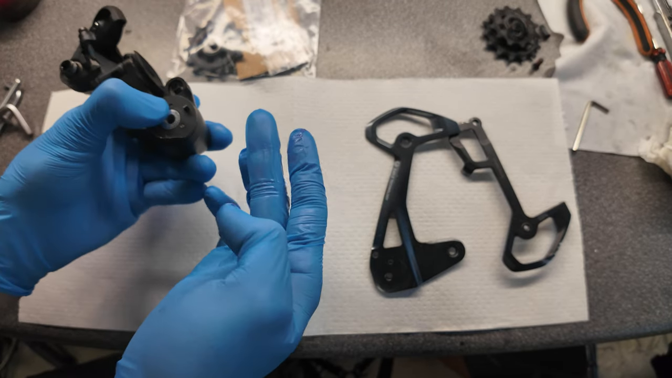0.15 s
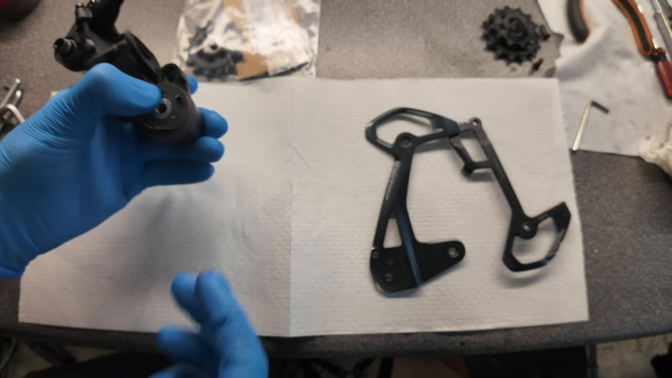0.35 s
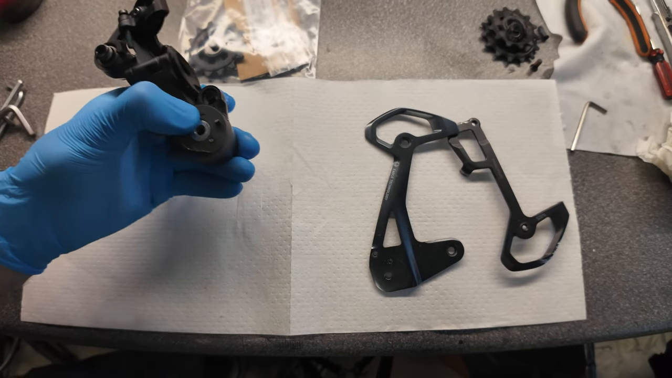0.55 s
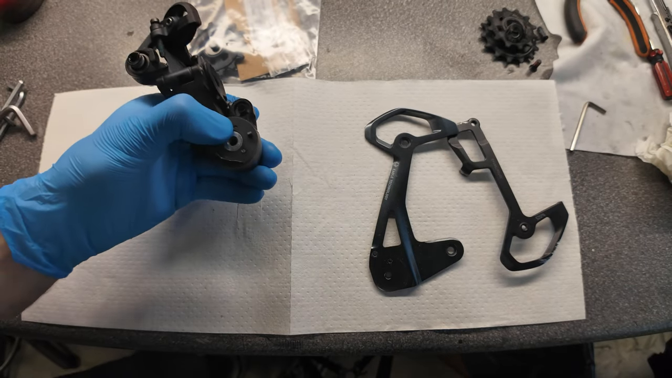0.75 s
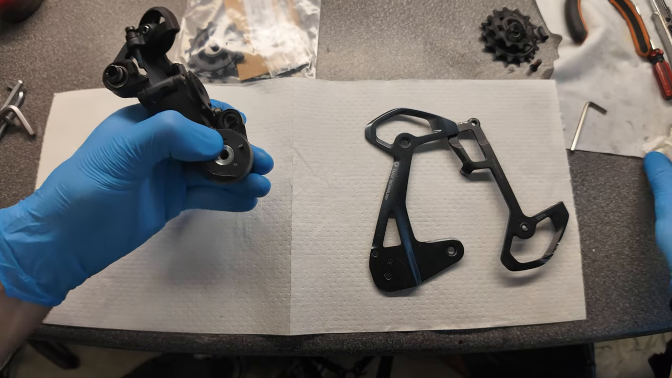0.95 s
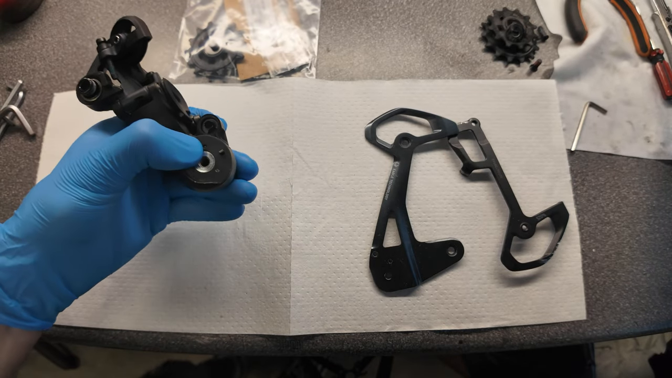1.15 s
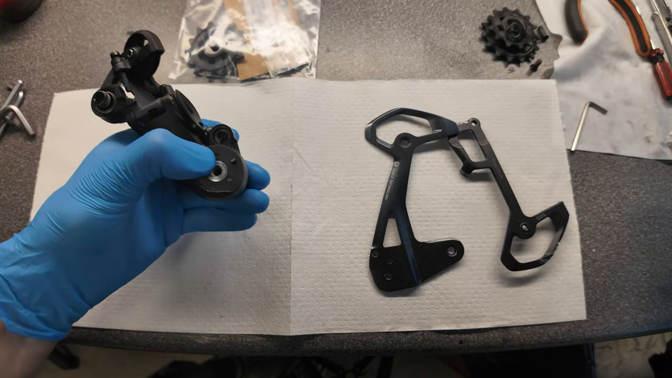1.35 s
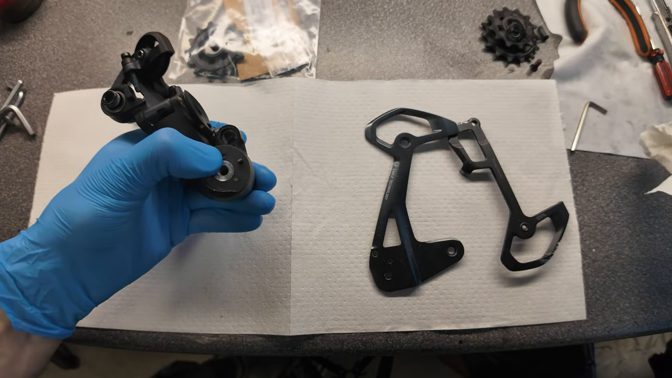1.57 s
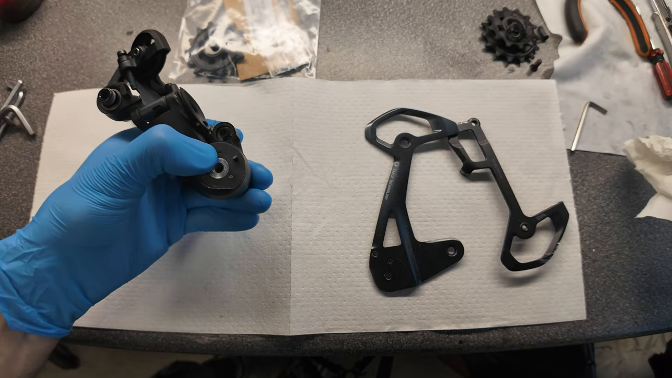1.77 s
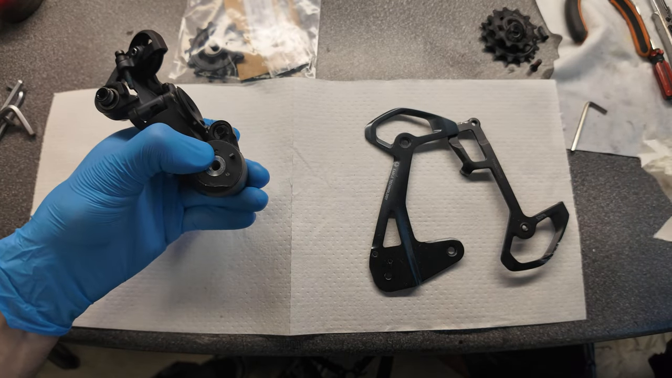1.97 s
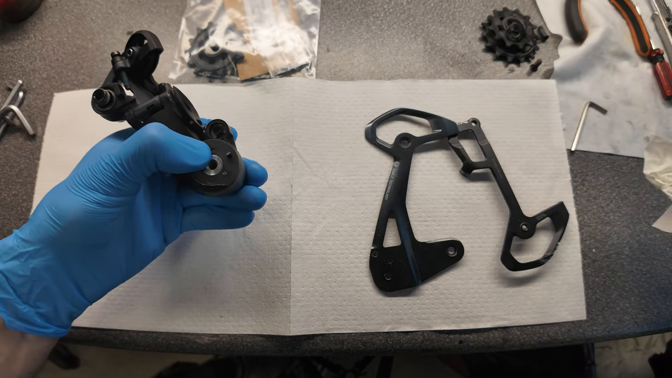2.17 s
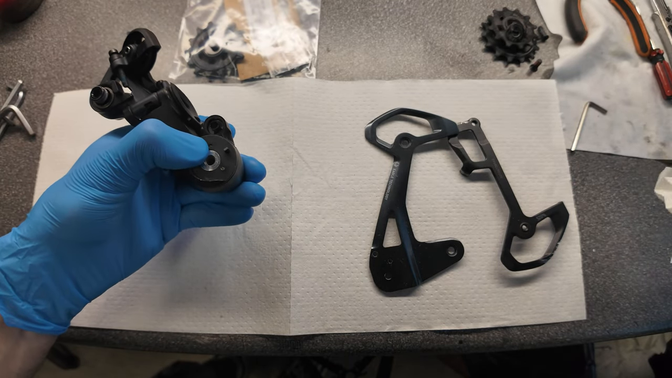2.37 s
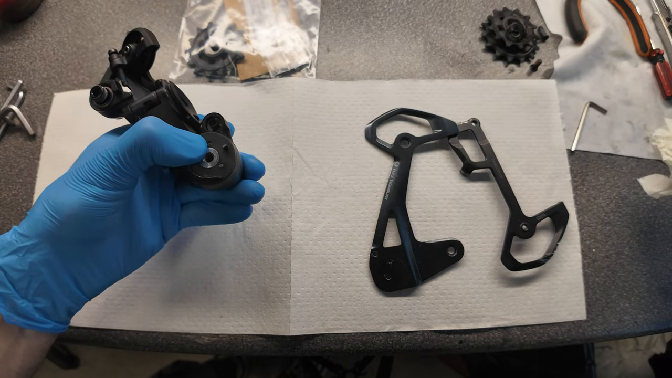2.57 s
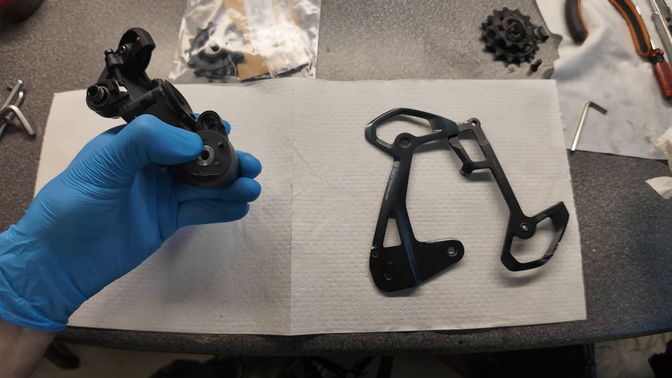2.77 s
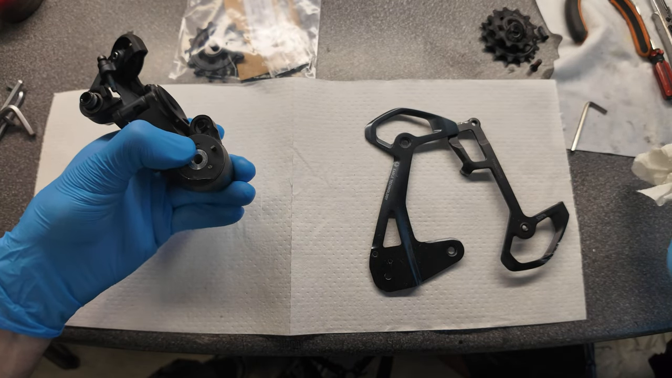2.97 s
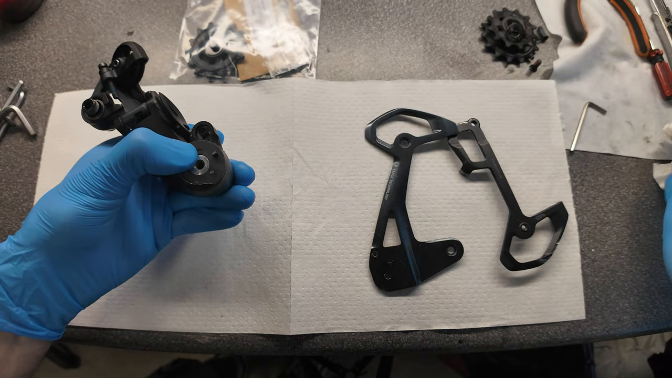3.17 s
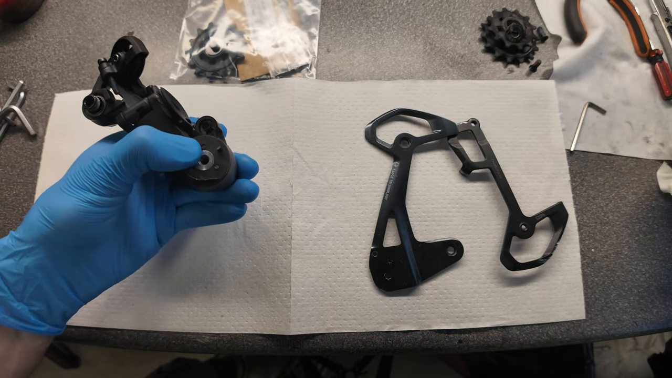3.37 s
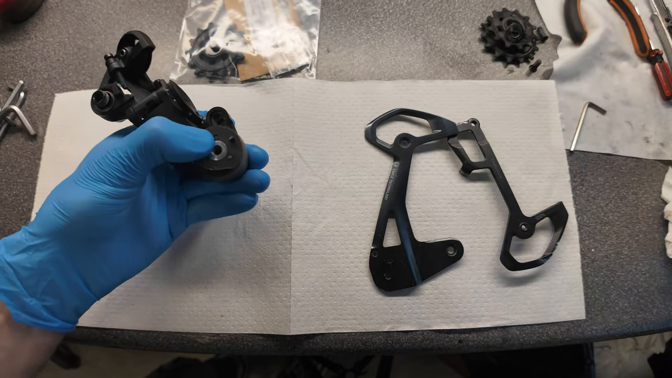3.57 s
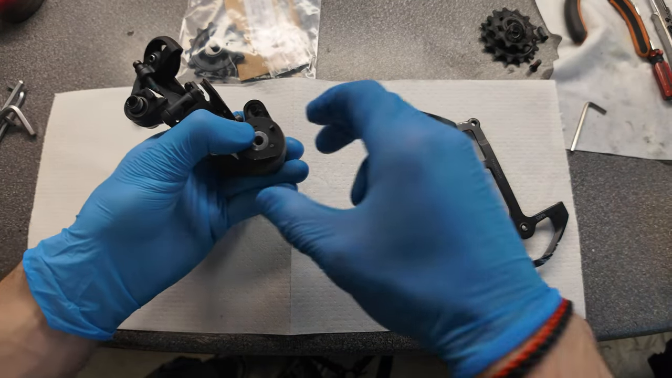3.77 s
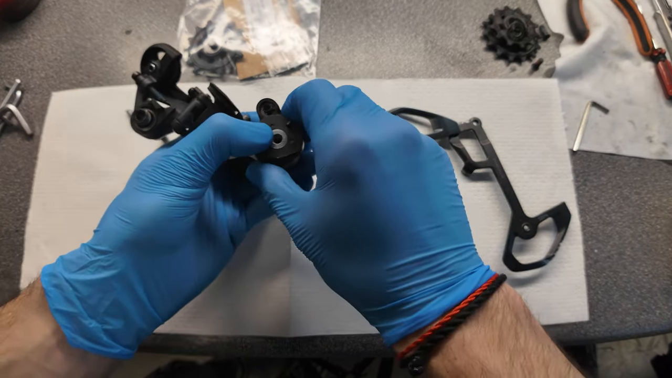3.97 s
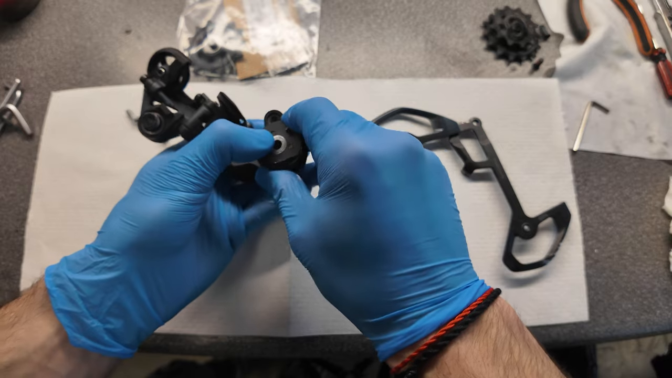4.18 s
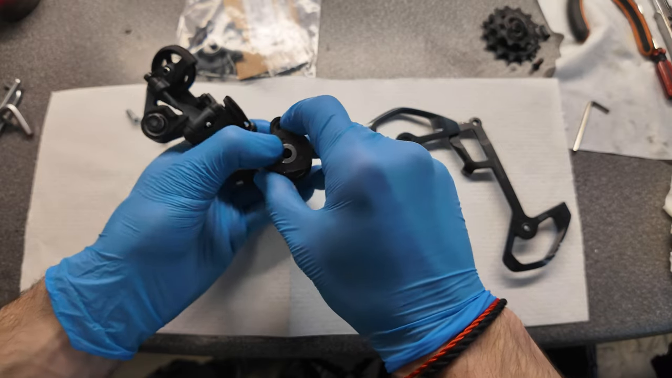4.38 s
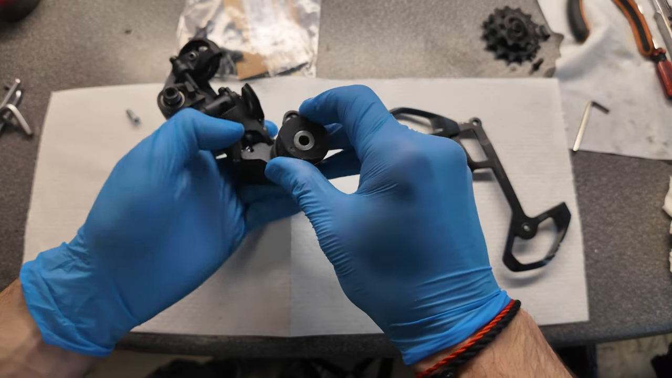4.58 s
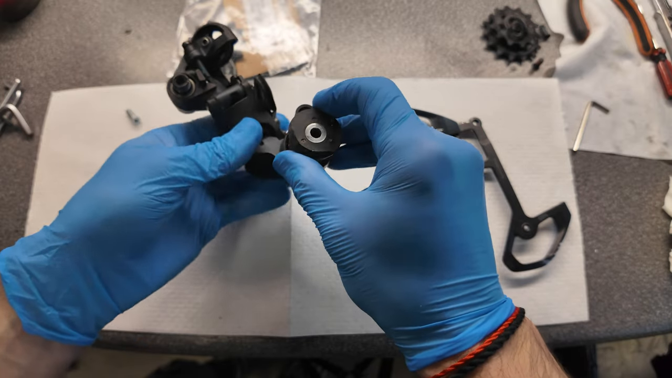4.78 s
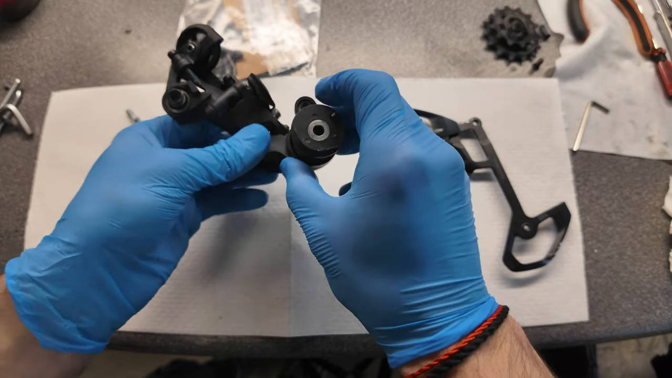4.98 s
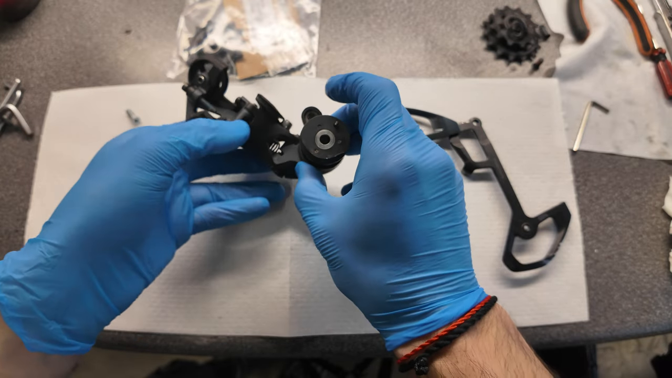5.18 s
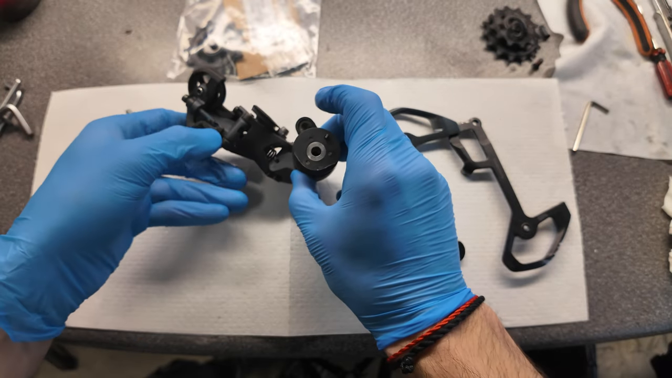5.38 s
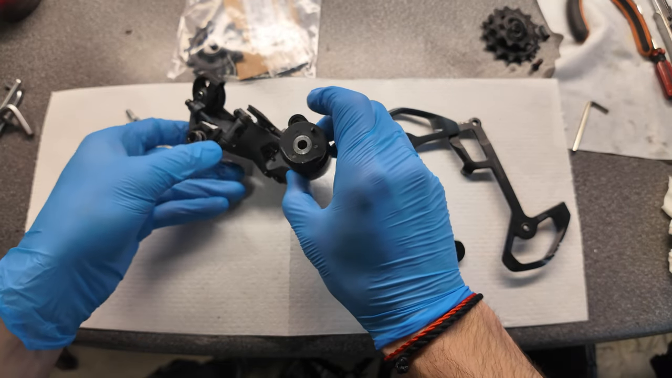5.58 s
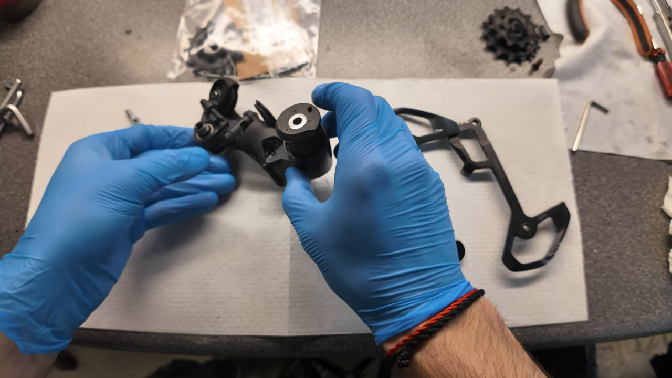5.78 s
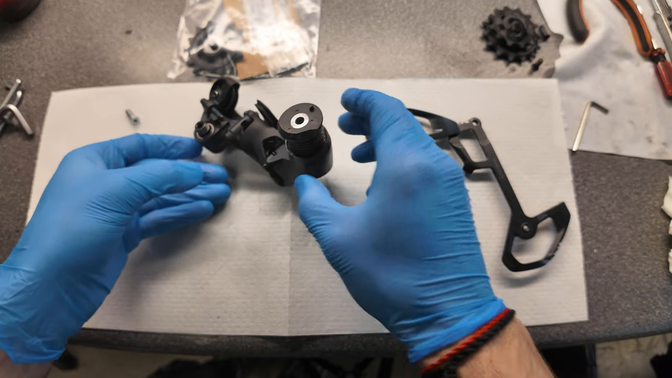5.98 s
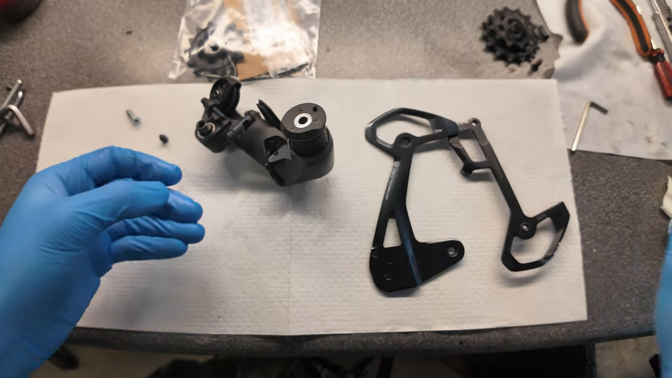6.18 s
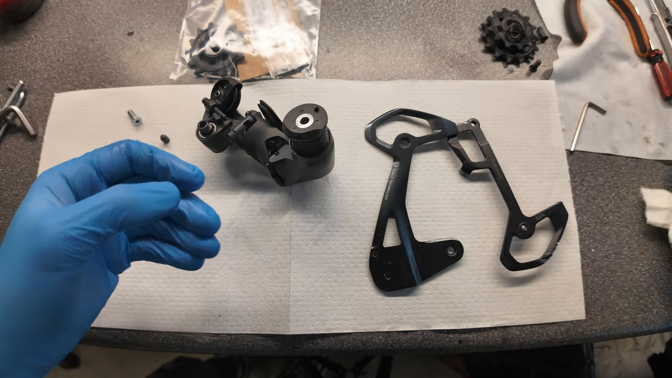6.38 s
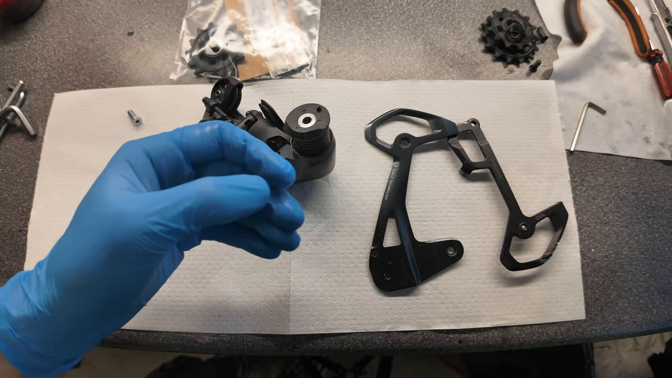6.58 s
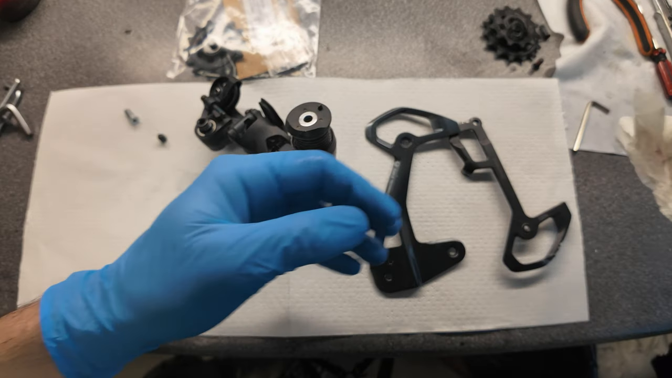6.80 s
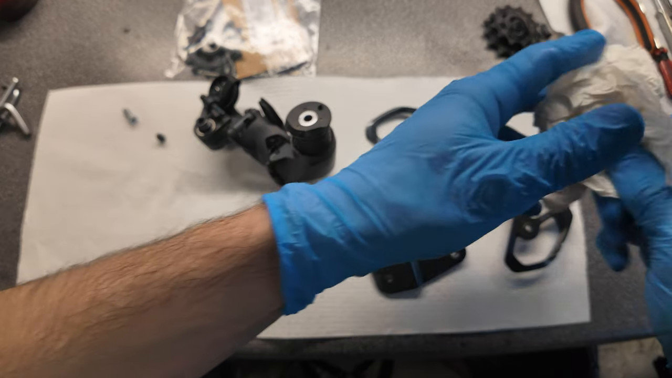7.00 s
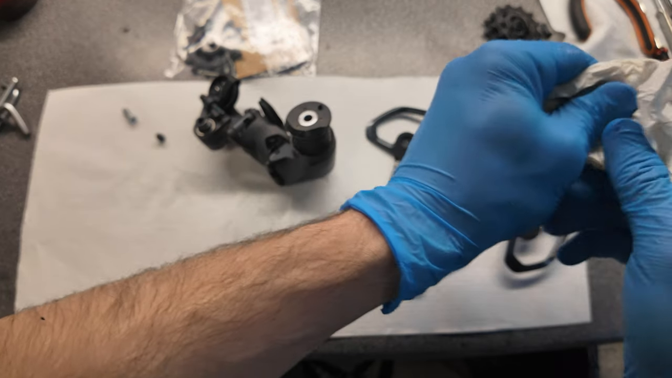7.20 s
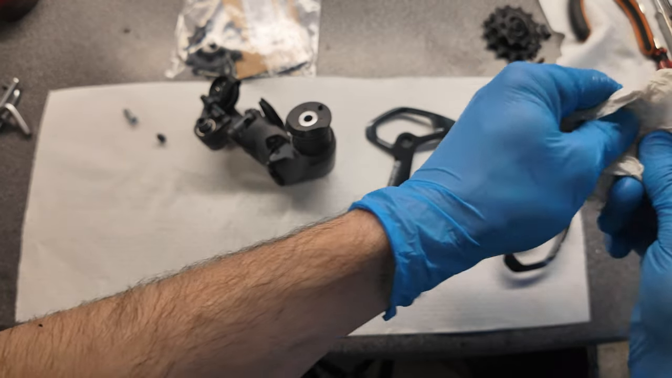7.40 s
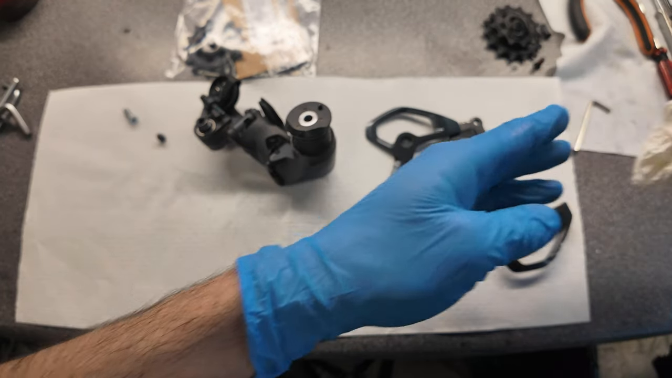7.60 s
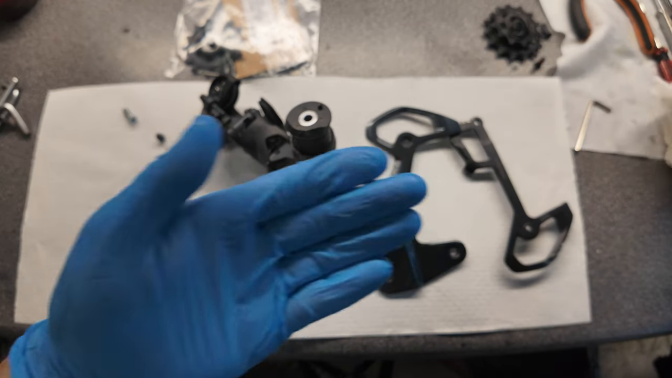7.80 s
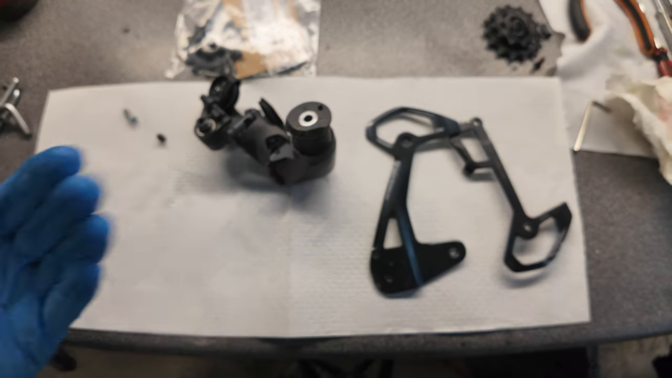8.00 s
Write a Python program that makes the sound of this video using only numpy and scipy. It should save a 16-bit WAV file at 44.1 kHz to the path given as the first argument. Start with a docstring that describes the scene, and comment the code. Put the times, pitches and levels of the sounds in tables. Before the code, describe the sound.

A close stereo microphone hears a workbench in a small room, with faint low motor hum and soft hush throughout. From 0 to 0.5 s rubber gloves rustle quietly with dull little bumps; a faint tap comes at 0.7 s. From about 1.05 to 3.3 s a crumpled paper towel wipes to the right in short, uneven hissing, crackling strokes, with sharp creases near 1.54 and 1.9 s. Ticks follow at 3.4 s. Gloves shift softly; a tiny squeak at 3.87 s leads to a brighter rasping slip that snaps free at 4.1 s. Light, damped steel rings dot 4.8 to 5.8 s. A muted knock at 5.52 s precedes a loud, woody double blow at 5.74-5.76 s, with rapid chatter, metallic clinks and a brief boom. From 6.4 s the towel rubs again, strongest around 7.1-7.7 s with crisp snaps at 7.1 s, then fades by 8 s.

```python
"""Gloved hands work on a metal bicycle part at a workbench, close up in a small humming room.
Rubber rustles from the start; then a paper towel, hissing and crackling with friction, wipes to the right.
A tight piece slips and snaps free in stick-slip squeaks, and small steel pieces touch with short rings.
A woody double knock of damped tones sets the part down, it chatters to rest, and the towel wipes again.
Hum from steady tones and a hush of shaped noise lie under it all."""
import sys
import numpy as np
from scipy import signal
from scipy.fft import rfft, irfft, next_fast_len
from scipy.io import wavfile
from scipy.ndimage import uniform_filter1d, map_coordinates

SR = 44100
rng = np.random.default_rng(int(sys.argv[2]) if len(sys.argv) > 2 else 0)


def waveform_to_disk(signal):
    """Save audio, clipped to [-1, 1], as 16-bit WAV at the path in sys.argv[1]."""
    frames = np.transpose(np.atleast_2d(signal))
    scaled = np.clip(frames, -1, 1) * 32767
    samples = np.round(scaled).astype(np.int16)
    wavfile.write(sys.argv[1], SR, samples)


N = 355005
TOP_HZ = 15900  # upper band limit

# Spectrum of fibre hiss: [f/Hz, level/dB]
PAPER_HISS = [(1400, -36), (2100, -5.5), (2800, 1), (3700, -1), (5200, 0), (7500, -5.5), (10000, -2.5),
              (13000, -4.5), (16000, -11)]
# Spectrum of the towel's fuller rub: [f/Hz, level/dB]
PAPER_BODY = [(100, -5), (300, -12), (450, -8), (610, -6), (740, -5.5), (880, 5), (1200, 1.5), (1550, 3),
              (2000, 3.5), (3000, -1), (4200, 2.5), (9000, -37)]
# The towel lies to the right: [f/Hz, left over right/dB]
PAPER_PAN = [(1500, -1.5), (3500, -2), (6000, -5), (10000, -7), (16000, -8.5)]
# How late the left microphone hears it: [f/Hz, phase/rad]
PAPER_LAG = [(350, 0.12), (600, 1.9), (780, 0.78), (1060, 3.3), (1190, 2.4), (1400, 1.45), (2200, 1.72),
             (3700, 2.69), (5500, 4.4), (10000, 6.3), (16000, 8.4)]


def towel(hiss_db=-1.0, crackle_db=-8, pop_db=-11, body_db=-4.5, hollow_db=-5.5,
          hiss_wet_db=-7, body_wet_db=-14, width_ms=0.024):
    """Paper fibres hiss over rubber, creases crackle, and the crumpled wad resounds as it is pressed."""
    hiss_gain, body_gain = wiping()
    resounding = body_gain * amp(hollow_db) * hollows()
    out = resounding + amp(body_wet_db) * room(resounding)
    # two faces of the wad rub, at slightly different angles to the microphones
    for lag_ms in (-width_ms, width_ms):
        hiss = friction(PAPER_HISS, rate=2500, spread_db=-0.5, smooth_db=5.0, clump_db=1.5)
        hiss = patches(hiss, depth_db=2.0)
        crackle = crinkles(rate=260, centre_hz=3300, octaves=.8, cycles=11, spread_db=3)
        body = friction(PAPER_BODY, rate=600, spread_db=1.0, smooth_db=-3.0, clump_db=2.0)
        body = patches(body, depth_db=1.5)
        pops = crinkles(rate=55, centre_hz=7000, octaves=.7, cycles=7, spread_db=3.5)
        treble = hiss_gain * (amp(hiss_db) * hiss + amp(crackle_db) * crackle + amp(pop_db) * pops)
        bass = body_gain * amp(body_db) * body
        reflected = room(amp(hiss_wet_db) * treble + amp(body_wet_db) * bass, gap=.0022)
        out += place(treble + bass, 0, lag_ms) + reflected
    sides = np.array([[.5], [-.5]])

    def to_the_right(hz):
        return amp(sides * along(PAPER_PAN, hz)) * np.exp(-1j * sides * along(PAPER_LAG, hz))

    return filtered(out, to_the_right)


# Strokes of the towel, at full speed at t: [t/s, rise/s, fall/s, hiss level/dB, body level/dB]
WIPES = [ (1.054, 0.0083, 0.031, -59, -48.5), (1.097, 0.035, 0.039, -48, -44),
         (1.23, 0.071, 0.037, -54.5, -57.5), (1.314, 0.055, 0.04, -47.5, -56),
         (1.405, 0.02, 0.05, -53, -63), (1.554, 0.037, 0.016, -44, -48.5), (1.633, 0.043, 0.033, -51, -59),
         (1.889, 0.015, 0.018, -50, -69), (2.055, 0.044, 0.054, -46.5, -58),
         (2.18, 0.032, 0.031, -53.5, -53.5), (2.293, 0.05, 0.048, -50, -58.5),
         (2.435, 0.03, 0.028, -54.5, -78), (2.555, 0.043, 0.045, -47.5, -62),
         (2.66, 0.037, 0.048, -55, -62.5), (2.92, 0.023, 0.025, -57.5, -72),
         (3.09, 0.048, 0.042, -58, -63.5), (3.22, 0.033, 0.029, -48, -54.5),
         (6.391, 0.0062, 0.04, -55.5, -61), (6.435, 0.031, 0.046, -51.5, -50.5),
         (6.642, 0.015, 0.013, -57, -57), (6.79, 0.094, 0.058, -52.5, -52.5),
         (6.97, 0.11, 0.13, -54.5, -56.5), (7.138, 0.042, 0.076, -41.5, -41.5),
         (7.262, 0.029, 0.055, -52.5, -45), (7.344, 0.083, 0.061, -47.5, -43.5),
         (7.52, 0.074, 0.086, -44, -45), (7.609, 0.085, 0.055, -46.5, -45),
         (7.738, 0.0088, 0.031, -47.5, -56.5), (7.84, 0.12, 0.061, -58, -69),
         (7.889, 0.005, 0.0089, -70, -49.5), (7.95, 0.029, 0.048, -73, -65.5)]
# The held towel drags lightly between strokes: [start t/s, end t/s, level/dB]
HOLDS = [(1.07, 2.423, -61), (2.526, 2.973, -61.5), (3.056, 3.299, -62.5), (6.407, 7.698, -66)]
HOLD_EDGE_S = 0.06  # fade at each end of a hold


def wiping():
    """Gains of the towel's hiss and body: strokes for both, the hiss also carrying the light drag while it is
    held."""
    t = np.arange(N) / SR
    drag = 0
    for start, end, db in HOLDS:
        drag = drag + amp(db) * np.clip(1 + np.minimum(t - start, end - t) / HOLD_EDGE_S, 0, 1)
    hiss = swells([(s, rise, fall, db) for s, rise, fall, db, _ in WIPES])
    body = swells([(s, rise, fall, db) for s, rise, fall, _, db in WIPES])
    return np.hypot(drag, hiss), body


# Hollows in the crumpled towel: [f/Hz, bandwidth/Hz, level/dB]
WAD_HOLLOWS = [(708, 77, -9), (856, 130, -3.5), (1482, 240, -0.5), (1890, 280, 0), (2500, 310, 2),
               (3080, 260, -2)]


def hollows(shift_db=5.0):
    """Fibres excite the hollows of the wad, which open and close in turn as it is kneaded; rms 1."""
    out = np.zeros(N)
    for hz, width, db in WAD_HOLLOWS:
        noise = rng.standard_normal(N)
        hollow = filtered(noise, lambda f: resonance(f, hz, width) ** 2)
        out += amp(db + shift_db * wobble(16)) * unit(hollow)
    return unit(out)


# The fingers shift, at full speed at t: [t/s, rise/s, fall/s, level/dB]
GLOVE_SHIFTS = [(.062, 0.033, 0.012, -63), (.135, 0.059, 0.027, -64.5), (.42, 0.08, 0.043, -68.5),
                (3.44, 0.14, 0.073, -70), (3.69, 0.012, 0.036, -69), (4.2, 0.22, 0.077, -69.5),
                (4.45, 0.19, 0.15, -76.5), (4.64, 0.096, 0.058, -63), (4.81, 0.12, 0.11, -66.5),
                (5.01, 0.1, 0.11, -70.5), (5.32, 0.16, 0.054, -71), (5.485, 0.025, 0.019, -64),
                (5.735, 0.032, 0.017, -66.5), (6.16, 0.029, 0.034, -75.5), (6.31, 0.047, 0.018, -71)]
# Spectrum of sliding rubber: [f/Hz, level/dB]
RUBBER = [(200, 0), (450, -1.5), (1000, -3.5), (2000, -6), (4000, -12.5), (5300, -15), (7500, -5),
          (9700, 6), (11000, 1.5), (12500, 0.5), (16000, -5.5)]


def gloves(crinkle_db=-8):
    """Thin rubber slides and crinkles as the fingers shift their grip."""
    slide = friction(RUBBER, rate=3000, spread_db=0.5, smooth_db=-1, clump_db=4.0)
    slide = patches(slide, depth_db=3.5)
    folds = crinkles(rate=170, centre_hz=7500, octaves=.6, cycles=14, spread_db=3)
    rub = swells(GLOVE_SHIFTS) * (slide + amp(crinkle_db) * folds)
    return amp(0.5) * place(rub, pan_db=9.0, lag_ms=-0.051) + amp(1.5) * room(rub, gap=0.0047)


# Sharp ticks: creases of the towel to the right, light contacts of gloves and part:
# [t/s, level/dB, treble tilt/dB, left over right/dB]
TICKS = [(0.711, -60, -14, -6), (1.041, -41.5, -15, -3), (1.5403, -34, -5, -3), (1.8845, -39, 8, -6),
         (2.48, -39.5, 7, -8), (2.963, -43.5, 15, -15), (3.4124, -45, 17, -19), (3.4521, -47, 6, -28.5),
         (4.18, -45, -5, 0), (4.235, -44, -3.5, 4), (5.185, -50, -12, 0), (5.2973, -45.5, -1, 5),
         (6.3869, -47, -4, -6), (7.0843, -38, 2, -6), (7.1097, -30, 2, -8), (7.7331, -39, 9, -9),
         (7.887, -48, -2, 8), (7.9623, -45.5, -3, -1)]
# Spectrum of a tick before its treble tilt: [f/Hz, level/dB]
TICK_COLOUR = [(500, 2.5), (2000, -9.5), (4000, -2.5), (5500, -4.5), (7500, -5), (10000, 6.5), (16000, 0.5)]


def ticks(t60=0.025, rise=0.00033, wet_db=-6):
    """Each towel crease or light contact is a brief burst of noise, bright or dull by its treble tilt."""
    out, t = np.zeros((2, N)), np.arange(SR // 4) / SR
    for s, db, treble_db, pan_db in TICKS:
        burst = colour(noise_burst(t, rise, t60), TICK_COLOUR)
        burst = filtered(burst, lambda hz: amp(along([(5000, 0.46), (10000, treble_db)], hz)))
        burst = amp(db) * burst / np.abs(burst).max()
        add(out, s, place(burst, pan_db, lag_ms=-0.022) + amp(wet_db) * room(burst))
    return out


# Small steel pieces touch lightly: [t/s, level/dB, f/Hz]
TINKS = [(4.841, -54.5, 6200), (5.041, -60, 4600), (5.349, -49.5, 5200), (5.553, -51.5, 4900),
         (5.7507, -52, 4600), (5.8305, -60, 6500), (6.323, -58, 5160)]


def tinks(t60=0.024, rise=0.00038, width_hz=900, pan_db=3, wet_db=-8):
    """Each light touch of steel rings for a moment, damped by the hand."""
    dry, t = np.zeros(N), np.arange(SR // 10) / SR
    for s, db, pitch_hz in TINKS:
        scrape = noise_burst(t, rise, t60)
        tink = filtered(scrape, lambda f: resonance(f, pitch_hz, width_hz))
        add(dry, s, amp(db) * tink / np.abs(tink).max())
    return place(dry, pan_db, lag_ms=-0.02) + amp(wet_db) * room(dry)


# The tight piece slips in short squeaks:
# [t/s, level/dB, length/s, stick-slip rate f/Hz, tilt/dB per octave from 2 to 12 kHz]
SLIPS = [(3.868, -60, 0.006, 2090, -14), (3.8754, -42.5, 0.0071, 1903, -13.5),
         (3.8845, -44.5, 0.004, 2076, -4), (3.9065, -55.5, 0.0034, 1960, -16),
         (4.1032, -38.5, 0.0039, 1746, -5.5), (4.1072, -35.5, 0.00262, 2270, -3.5),
         (4.1108, -31.5, 0.0017, 3600, 2)]
# Resonances of the part, damped by the grip: [f/Hz, bandwidth/Hz, level/dB]
PART = [(826, 280, -1), (1490, 360, 3.5), (2080, 440, 10.5), (2420, 300, -3), (3080, 350, 2),
        (3680, 320, -5), (5130, 1100, 0), (7600, 1300, -2.5), (9700, 1600, 0.5)]
# What slips out between the fingers: [f/Hz, level/dB]
ESCAPE = [(700, -9), (1400, -5), (2100, 0.5), (2800, -1), (4300, -7), (10000, -6.5), (16000, -14)]


def slips(echo_s=.01, echo_t60=0.04, echo_db=-5, wet_db=-6):
    """The tight piece sticks and slips; each squeak swells, rasps through the part and breaks off."""
    dry, bare, t = np.zeros(N), np.zeros(N), np.arange(SR // 10) / SR

    def part(f):
        modes = sum(amp(db) * resonance(f, centre, width) for centre, width, db in PART)
        return modes * amp(along([(500, -3.5), (1300, -0.5), (11000, -1.5), (13500, -14)], f))

    for s, db, length, rate_hz, tilt_db in SLIPS:
        rasp = judder(rate_hz, len(t)) * np.sqrt(t / length) * (t < length)
        rasp = filtered(rasp, lambda hz: amp(tilt_db * np.log2(np.clip(hz, 2000, 12000))))
        squeak = filtered(rasp, part)
        gain = amp(db) * np.sqrt(length * SR) / np.linalg.norm(squeak)
        add(dry, s, gain * squeak)
        add(bare, s, gain * rasp)
    # the bare rasp escapes the hands and comes back as a scattered echo, then the room
    escaping = filtered(bare, lambda hz: amp(along(ESCAPE, hz)))
    scatter = rng.standard_normal((2, len(t))) * 10 ** (-3 * t / echo_t60)
    scatter = scatter / np.linalg.norm(scatter[0])
    out = place(dry, pan_db=1.5, lag_ms=-0.028) + amp(wet_db) * room(escaping, gap=.014)
    add(out, echo_s, amp(echo_db) * signal.fftconvolve(escaping[None], scatter, axes=1))
    return out


SLIP_JITTER, SLIP_RASP_DB = .13, -4  # unevenness of the stick-slip cycles; dry scraping beside them


def judder(hz, size):
    """One jerk for each stick-slip cycle, uneven in time and strength, over a dry scrape."""
    late, strength = rng.standard_normal((2, 64))
    when = np.cumsum(np.exp(SLIP_JITTER * late)) / hz
    jerks = np.bincount((when * SR).astype(int), amp(2 * strength), size)[:size]
    jerks = (jerks - hz / SR) * np.sqrt(SR / hz)  # without their mean push
    return jerks + amp(SLIP_RASP_DB) * rng.standard_normal(size)


# The part meets the bench, the last blow setting it down: [t/s, level/dB, contact cut-off f/Hz]
KNOCKS = [(.709, -47, 1720), (5.5237, -23.5, 556), (5.7364, -15.5, 454), (5.763, -9, 906)]
# Damped tones that give the knock its woody, booming colour: [f/Hz, level/dB, t60/s]
KNOCK_TONES = [(114.8, -4.5, 0.17), (150, -1, 0.13), (187, 2, 0.11), (223, -12, .28), (262.8, -7, 0.24),
               (312.7, -6.5, 0.15), (409, -8.5, 0.12), (457, 6, 0.053), (548, -11, 0.19), (608, -22, 0.24),
               (669, -12.5, 0.14), (766, -12.5, 0.092), (907, -11.5, 0.18), (1217, -26, 0.56),
               (1280, -27, .22), (1325, -24, 0.27), (1400, -29, 0.18), (1600, -23, 0.18)]
# Spectrum of the push and of the shuddering clutter: [f/Hz, level/dB]
THUD = [(30, -56), (65, 10), (105, 13.5), (170, -15), (240, -2), (330, 8), (470, -3.5), (700, -2.5),
        (1100, -6), (1500, -4), (2500, -10.5), (6000, -25)]
BOUNCE_DB, BOUNCE_HZ = -19, 840  # bounce level before the losses; contact cut-off


def knocks(push_db=-3, ring_db=-2, rattle_db=-12, rattle_t60=0.16, rattle_rise=0.0004, wet_db=-13):
    """The part lands on the paper-covered bench, whose clutter shudders; a higher cut-off is brighter."""
    out, t = np.zeros((2, N)), np.arange(SR // 2) / SR
    chatter = [(s, BOUNCE_DB - lost, BOUNCE_HZ) for s, lost in bounces(count=4)[1:]]
    for s, db, contact_hz in KNOCKS + chatter:
        shudder = (1 - np.exp(-t / rattle_rise)) * 10 ** (-3 * t / rattle_t60) / 2
        rattle = amp(rattle_db) * shudder * colour(diffuse(ROOM_ALIKE, len(t)), THUD)
        blow = amp(ring_db) * ring(KNOCK_TONES, t)
        add(blow, 0, amp(push_db) * pulse(THUD))
        # the paper cushions the contact
        blow_cushion = signal.butter(3, contact_hz, fs=SR, output="sos")
        rattle_cushion = signal.butter(2, contact_hz, fs=SR, output="sos")
        blow = -amp(db) * signal.sosfilt(blow_cushion, blow)
        rattle = amp(db) * signal.sosfilt(rattle_cushion, rattle)
        add(out, s, blow + rattle + amp(wet_db) * room(blow))
    # little deep bass is left in the knock
    return signal.sosfilt(signal.butter(2, 70, "high", fs=SR, output="sos"), out)


# first flight; each next flight over the one before; level lost per bounce
BOUNCE_S, BOUNCE_SHRINK, BOUNCE_LOSS_DB = .0095, 0.9, 3


def bounces(count):
    """(s, dB lost) of the ever quicker contacts of the part, starting with the blow that sets it down."""
    k = np.arange(count)
    flights = BOUNCE_S * BOUNCE_SHRINK ** k
    times = KNOCKS[-1][0] + np.cumsum(flights) - flights
    return list(zip(times, BOUNCE_LOSS_DB * k))


# Spectrum of the loose steel links: [f/Hz, level/dB]
LINKS = [(1000, -17), (2800, -9), (4100, 3), (5300, -5), (7600, 0), (8900, 4), (10500, -8), (13000, -7),
         (16000, -18)]


def clinks(level_db=-36.5, pan_db=3.5, t60=0.019, rise=0.0017):
    """The loose steel links clink each time the landing part touches the bench."""
    dry, t = np.zeros(N), np.arange(SR // 10) / SR
    for s, lost in bounces(count=4):
        clink = colour(noise_burst(t, rise, t60), LINKS)
        add(dry, s, amp(level_db - lost) * clink / np.abs(clink).max())
    return place(dry, pan_db, lag_ms=-0.023) + amp(-14) * room(dry)


# Soft bumps of the hands: [t/s, level/dB before a common lift]
BUMPS = [(0.365, -50.5), (.428, -46), (1.049, -44), (1.102, -49), (1.553, -50.5), (4.115, -42.5),
         (4.992, -47), (7.24, -44.5), (7.959, -47.5)]


def bumps(width=0.0015):
    """Hands nudge the part and the bench: one dull push and rebound each."""
    dry, u = np.zeros(N), np.arange(SR // 20) / SR / width - 4
    for s, db in BUMPS:
        add(dry, s, amp(db + 1.0) * u * np.exp((1 - u * u) / 2))
    return dry + amp(-11.0) * room(dry)


# Tones of the motors: [f/Hz, relative level/dB]
HUM = [(55.9, -80), (111.8, -64.5), (156, -66.5), (167.7, -62), (173, -74), (179.8, -69), (276.8, -88.5)]
# Spectrum of the room's hush before its final shaping: [f/Hz, level/dB]
AIR = [(15, -62), (25, -19), (53, -1), (116, -6.5), (137, 2.5), (170, 4.5), (228, -26), (276, -28),
       (382, -34.5), (710, -31), (1220, -31), (1680, -32.5), (1980, -34.5), (10300, -44), (15800, -39.5)]
# Left-right likeness of the hush: [f/Hz, correlation]
AIR_ALIKE = [(100, 0.95), (400, 0.65), (1000, 0.34), (2500, 0.071), (10000, 0.039)]


def background():
    """Motors hum with tones that beat and wander in phase, over the hush of the room."""
    t = np.arange(N) / SR
    hum = np.zeros(N)
    for hz, db in HUM:
        phase = 2 * np.pi * (hz * t + rng.random()) + 0.32 * wobble(1.445)
        hum += np.sqrt(2) * amp(db) * np.sin(phase)
    shaping = [(70, -6.0), (160, -9.0), (300, 14.5), (1000, 2.0), (4000, 4.0)]  # (Hz, dB)
    hush = colour(diffuse(AIR_ALIKE, N), AIR)
    hush = filtered(hush, lambda hz: amp(along(shaping, hz)))
    return amp(-3.5) * hum + amp(-57.5) * hush


# Left-right likeness of scattered sound: [f/Hz, correlation]
ROOM_ALIKE = [(150, 0.99), (500, 0.79), (1200, 0.19), (2500, 0.014)]
# Decay of the room: [f/Hz, t60/s]
ROOM_DECAY = [(100, 0.49), (500, 0.2), (2000, 0.19), (12000, 0.14)]


def room(x, gap=.009):
    """The room answers after a short gap (s); treble dies first."""
    hz, t, z = signal.stft(diffuse(ROOM_ALIKE, SR // 3), SR, nperseg=256)
    decay = amp(-60 * t / along(ROOM_DECAY, hz)[:, None])
    tail = signal.istft(z * decay, SR, nperseg=256)[1]
    tail = np.pad(tail / np.linalg.norm(tail[0]), ((0, 0), (round(gap * SR), 0)))
    return signal.fftconvolve(x[None], tail, axes=1)[:, :len(x)]


def friction(spectrum, rate, spread_db, smooth_db, clump_db):
    """Countless tiny catches of uneven size over a smooth sliding hiss, all in clumps; rms 1."""
    caught = rng.random(N) < rate / SR
    catches = caught * rng.standard_normal(N) * amp(spread_db * np.minimum(rng.exponential(size=N), 4))
    sliding = unit(catches) + amp(smooth_db) * rng.standard_normal(N)
    return colour(sliding * amp(clump_db * wobble(130)), spectrum)


def crinkles(rate, centre_hz, octaves, cycles, spread_db, size=256):
    """Tiny folds pop over at random, each with its own pitch and strength; rms 1."""
    count = int(rate * N / SR)
    when, strength = rng.random((count, 2)).T
    hz = np.minimum(centre_hz * 2 ** (octaves * rng.standard_normal((count, 1))), TOP_HZ)
    turns = hz * np.arange(size) / SR
    gain = amp(-spread_db * np.log(np.maximum(strength, np.exp(-3))))[:, None] * np.sqrt(hz)
    pops = gain * np.sin(2 * np.pi * turns) * 10 ** (-3 * turns / cycles)
    where = (when * N).astype(int)[:, None] + np.arange(size)
    return unit(np.bincount(where.ravel(), pops.ravel(), N)[:N])


def patches(x, depth_db):
    """Folds open and close, so the colour shifts from moment to moment; rms 1."""
    z = signal.stft(x, nperseg=256)[2]
    field = uniform_filter1d(rng.standard_normal(z.shape), 7, 0)  # smooth over frequency
    field = uniform_filter1d(field, 14, 1)  # and over time
    return unit(signal.istft(z * amp(depth_db * unit(field)), nperseg=256)[1][:N])


STROKE_SHAPE = 1.37  # a swell is pointed at 1 and bell-shaped at 2


def swells(strokes):
    """Gain of (s, rise, fall, dB) strokes: each speeds up, peaks and slows down; their powers add."""
    t = np.arange(N) / SR
    power = np.zeros(N)
    for s, rise, fall, db in strokes:
        reach = np.maximum((s - t) / rise, (t - s) / fall)
        power += (amp(db) * np.exp(-np.abs(reach) ** STROKE_SHAPE)) ** 2
    return np.sqrt(power)


def noise_burst(t, rise, t60):
    """Noise that starts within the rise (s) and dies by 60 dB in t60 (s)."""
    return rng.standard_normal(len(t)) * (1 - np.exp(-t / rise)) * 10 ** (-3 * t / t60)


def resonance(f, centre, width):
    """Response of one damped resonance, 1 at its centre (Hz)."""
    return 1j * f * width / (centre ** 2 - f * f + 1j * f * width)


def ring(tones, t):
    """Damped tones that start together, peak 1."""
    y = sum(amp(db) * 10 ** (-3 * t / t60) * np.sin(2 * np.pi * hz * t) for hz, db, t60 in tones)
    return y / np.abs(y).max()


def pulse(spectrum, size=4096):
    """The causal pulse with this spectrum, peak 1."""
    cepstrum = irfft(np.log(amp(along(spectrum, np.fft.rfftfreq(size, 1 / SR)))))
    p = irfft(np.exp(rfft(2 * cepstrum[:size // 2], size)))
    return p / np.abs(p).max()


def diffuse(alike, size):
    """Stereo noise whose channels agree as much as alike says."""
    def mid_side(hz):
        turn = np.arccos(np.clip(along(alike, hz), -1, 1)) / 2
        return np.array([np.cos(turn), np.sin(turn)])

    mid, side = filtered(rng.standard_normal((2, size)), mid_side)
    return np.array([mid + side, mid - side])


def place(x, pan_db, lag_ms):
    """A source to one side: louder in one microphone, later in the other (lag > 0: left is late)."""
    sides = np.array([[.5], [-.5]])
    lag_s = sides * lag_ms / 10 ** 3
    return filtered(x, lambda hz: amp(sides * pan_db) * np.exp(-2j * np.pi * hz * lag_s))


def wobble(rate):
    """A smooth random curve, rate knots a second."""
    knots = rng.standard_normal(int(N * rate / SR) + 4)
    return map_coordinates(knots, [np.arange(N) * rate / SR])


def colour(x, spectrum):
    """Shape by (Hz, dB) points, to rms 1."""
    return unit(filtered(x, lambda hz: amp(along(spectrum, hz))))


def filtered(x, response):
    """x times a complex response of frequency."""
    n = x.shape[-1]
    m = next_fast_len(n + SR // 4)
    return irfft(rfft(x, m) * response(np.fft.rfftfreq(m, 1 / SR)), m)[..., :n]


def along(points, hz):
    """(Hz, value) points read on a log axis."""
    f, v = np.transpose(points)
    return np.interp(np.log(hz + 1), np.log(f + 1), v)


def add(track, s, sound):
    """Mix a sound in at time s."""
    part = track[..., round(s * SR):][..., :sound.shape[-1]]
    part += sound[..., :part.shape[-1]]


def amp(db):
    """Decibels to gain."""
    return 10 ** (np.asarray(db) / 20)


def unit(x):
    """Scale to rms 1."""
    return x / np.sqrt(np.mean(x ** 2) + 1e-20)


def scene():
    """Everything heard at the bench."""
    handling = towel() + gloves() + ticks() + tinks() + slips()
    landing = knocks() + clinks() + bumps()
    return handling + landing + background()


def record(dry):
    """The recorder drops the deepest bass and everything above its band limit."""
    thin = filtered(dry, lambda hz: amp(along([(25, -21), (40, -17.5), (60, 0.5)], hz)))
    return filtered(thin, lambda hz: hz < TOP_HZ)


dry = scene()
out = record(dry)
waveform_to_disk(out)
```